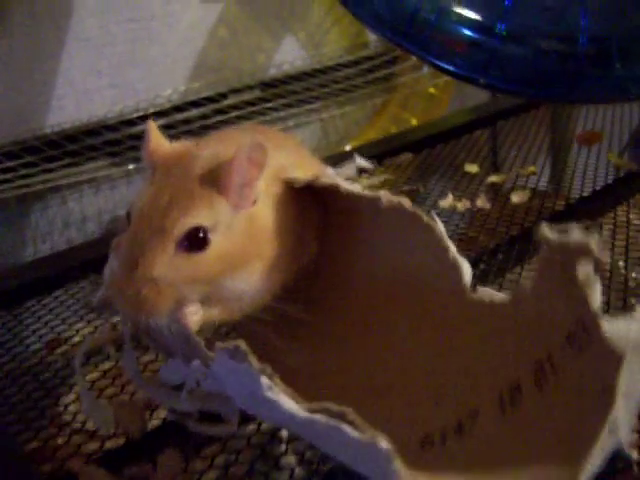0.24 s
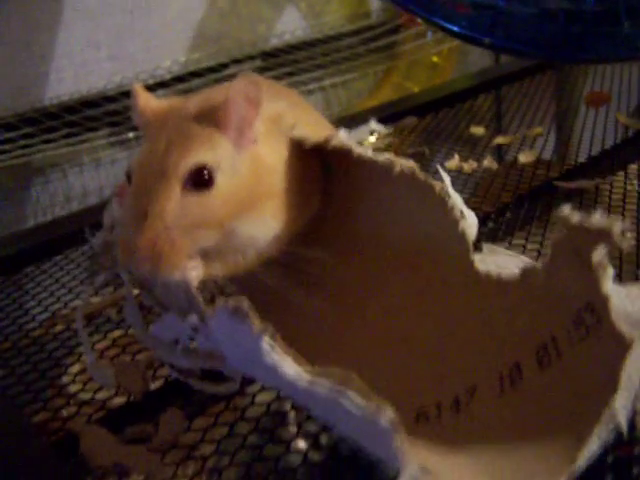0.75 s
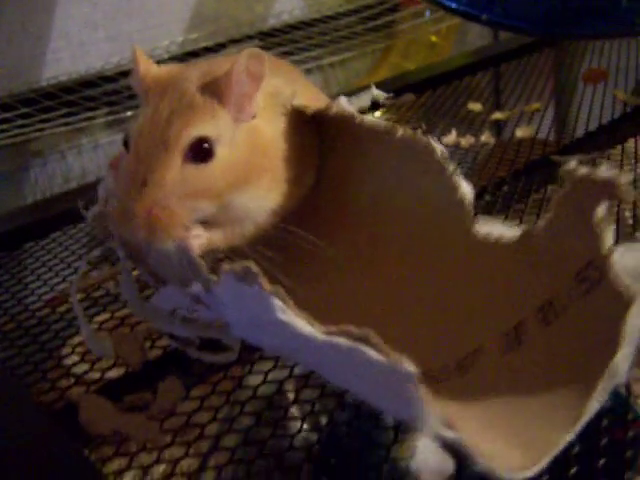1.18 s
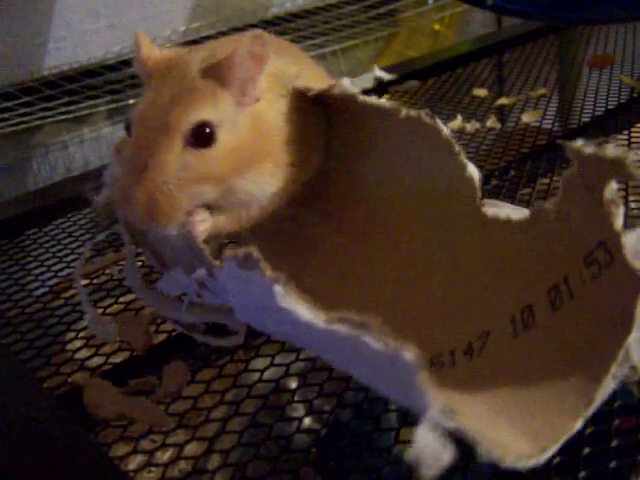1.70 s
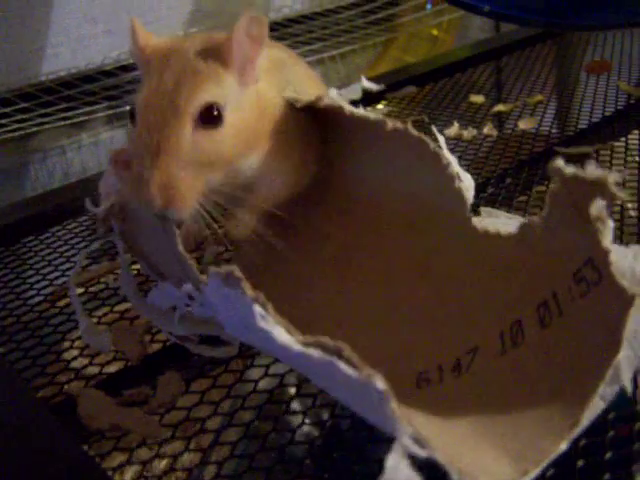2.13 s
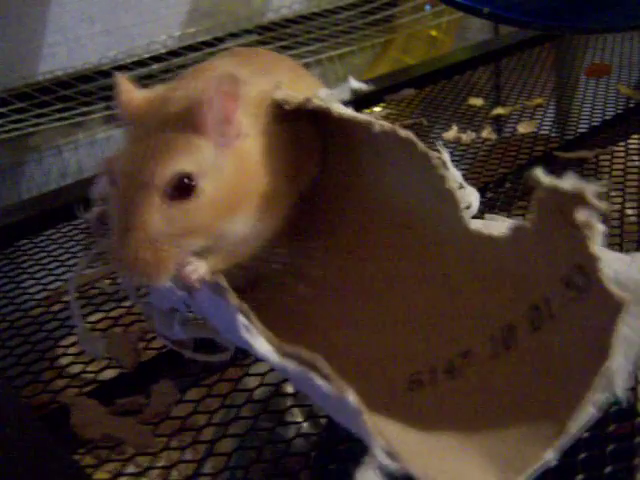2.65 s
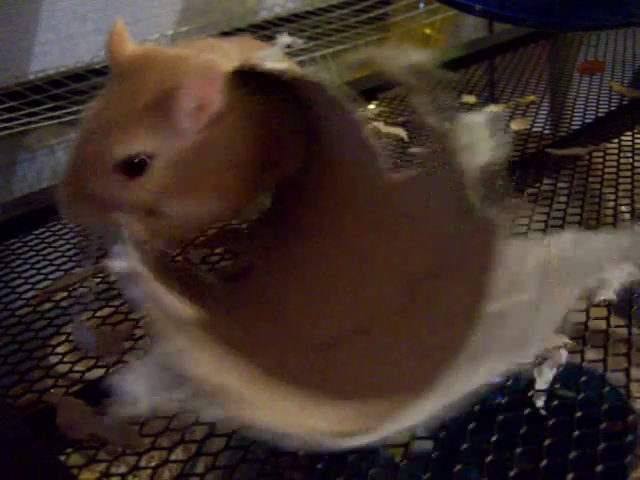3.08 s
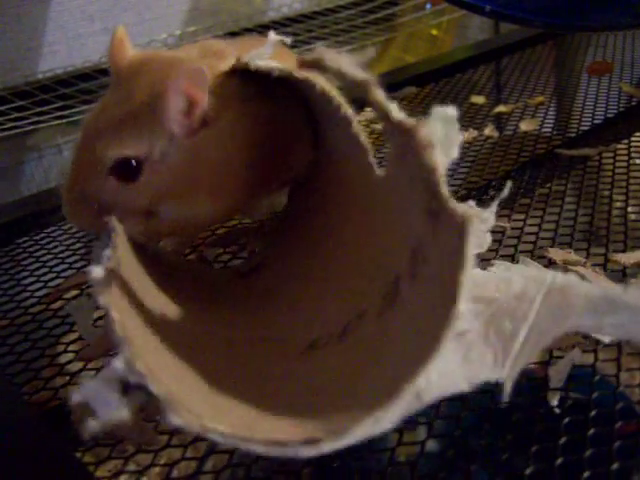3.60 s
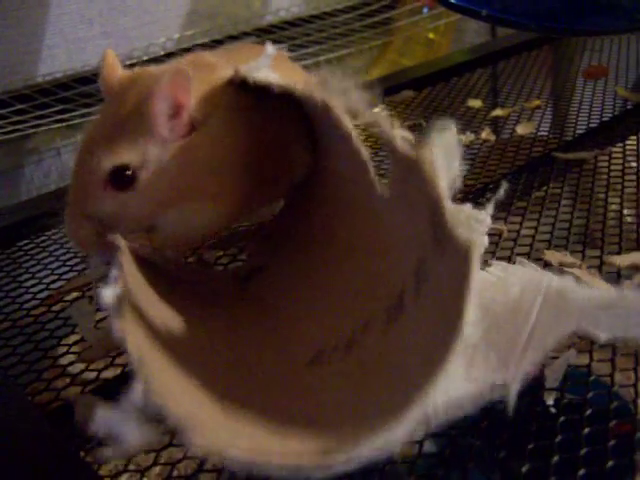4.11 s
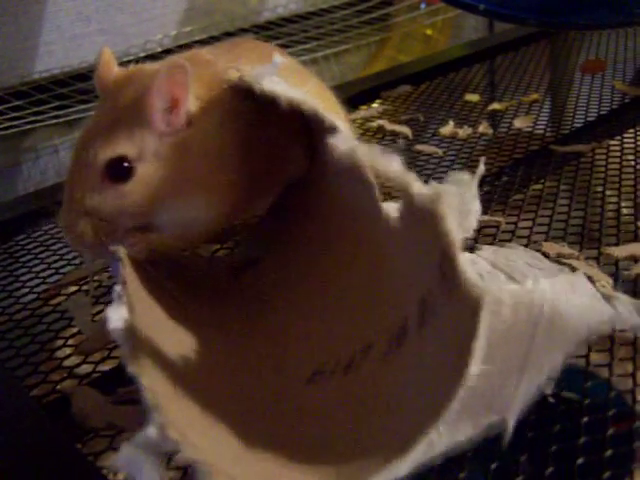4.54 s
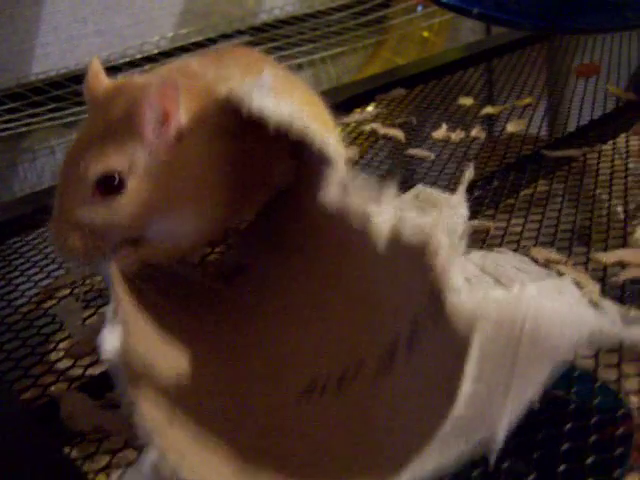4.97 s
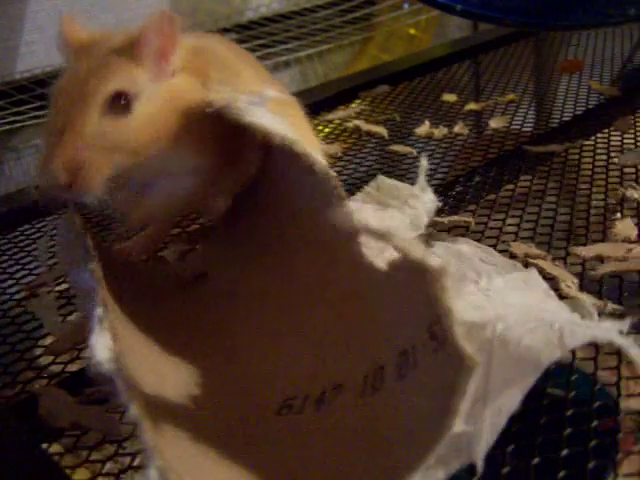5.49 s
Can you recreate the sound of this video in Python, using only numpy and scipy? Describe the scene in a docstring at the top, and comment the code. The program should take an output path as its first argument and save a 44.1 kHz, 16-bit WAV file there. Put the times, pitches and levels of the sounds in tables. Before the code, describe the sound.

Close mono pickup by a small camera in a cage: teeth nip and pull at stiff card. Clicky snaps cluster quickly through the first three seconds, the hardest near 0.8; longer crisp tearing pulls follow, more spaced, with another hard crack just after five seconds. Hollow papery ring, tiny scratches, muffled floor knocks around one and two seconds, faint hiss, and a low hum strongest at the start.

```python
"""In its cage, a gerbil gnaws a cardboard tube on the wire mesh floor, close to a small camera.
Each pull of the teeth is a crackle of random fibre breaks, each break a click coloured by card.
Whole plies give way in snaps and short rips that ring in the tube, made of sparse fading echoes.
Bumps are decaying sines and scuffs are shaped noise; a fading low hum and a faint hiss lie beneath."""
import sys
import numpy as np
from scipy import signal
from scipy.fft import rfft, irfft
from scipy.io import wavfile

SR = 44100
rng = np.random.default_rng(int(sys.argv[2]) if len(sys.argv) > 2 else 0)


def unload_wav(signal):
    """Save mono or channel-first audio to the path in sys.argv[1] as 16-bit WAV at rate SR, clipped to [-1, 1]."""
    wavfile.write(
        sys.argv[1],
        SR,
        np.round(np.clip(np.atleast_2d(signal).T, -1, 1) * 32767).astype(np.int16),
    )


N = 253134  # length in samples

# Plies that break. Each row: time in seconds, level in dB over 10 ms, pitch of the loose flap in Hz,
# time the crack runs in seconds, bass tilt in dB, treble tilt in dB.
PLY_SNAPS = [(0.0098, -32, 3027, 0.003161, 2.5, -3), (0.1442, -22, 1630, 0.00424, -6.5, -6.5),
             (0.2922, -17.5, 2809, 0.000407, -8.5, 1), (0.3381, -23.5, 1568, 0.003677, -5.5, -6.5),
             (0.376, -36, 2170, 0.001857, 4.5, -9.5), (0.4393, -42, 2264, 0.002509, 4.5, -17.5),
             (0.514, -37.5, 2515, 0.00113, 5.5, -16.5), (0.65, -31.5, 2913, 0.002073, -0.5, 5.5),
             (0.841, -14, 3043, 0.000437, -8, -3), (0.9321, -26, 1600, 0.00415, -16.5, -0.5),
             (1.0715, -23, 4274, 0.002762, -2.5, 0.5), (1.1019, -28, 2476, 0.003646, -2.5, 2),
             (1.2336, -32.5, 3129, 0.000722, -7, 0), (1.2874, -34.5, 2902, 0.0013, 2, -13),
             (1.3732, -34.5, 2230, 0.00039, -13.5, 1.5), (1.56, -22.5, 4371, 0.00053, -4.5, -4),
             (1.5625, -21, 3192, 0.000301, -15.5, -7), (1.661, -32.5, 1657, 0.00441, -2, -2),
             (1.7342, -32, 2757, 0.002698, -7, 1.5), (1.8271, -20, 1630, 0.005993, -8.5, -6),
             (1.901, -26.5, 3120, .002, -9.5, -2.5), (1.9106, -25.5, 3066, 0.004697, -6, -0.5),
             (1.9204, -22.5, 2864, 0.001303, 9.5, -3.5), (2.2125, -34.5, 2688, 0.002067, 1, -7.5),
             (2.3818, -26.5, 1540, 0.0076, -14.5, -5.5), (2.6209, -21.5, 2481, 0.003126, -3.5, 7),
             (2.651, -32.5, 3035, 0.002468, -3.5, -6), (2.7374, -25, 1806, 0.00355, -19, 4),
             (2.785, -24.5, 3013, 0.000778, 2, 0.5), (2.9113, -30, 2839, 0.003386, 6, 9),
             (3.1731, -33, 2764, 0.002265, -11, 2.5), (3.279, -26.5, 2430, 0.001881, -3.5, -0.5),
             (3.29, -30, 2420, 0.0012, -18, 0), (3.4203, -27.5, 2586, 0.000531, -1, 2.5),
             (3.461, -32, 4218, 0.00077, 1, 1), (3.6641, -32.5, 1556, 0.005072, -2.5, -1),
             (3.7577, -34, 1880, 0.00198, 3, 7.5), (3.9401, -22, 3827, 0.00561, 1.5, 1),
             (4.1123, -29.5, 3700, 0.007056, 8, 9), (4.3741, -27.5, 3043, 0.002444, -4, 8),
             (4.5828, -32, 2882, 0.0054, 7, -7.5), (4.5957, -33, 2716, 0.006133, -0.5, 6),
             (4.7065, -23, 2937, 0.007114, 5, 2.5), (4.8371, -31.5, 3436, 0.01014, 0.5, 1),
             (5.1324, -32, 2026, 0.00135, -8.5, 7.5), (5.1754, -15.5, 1766, 0.0007413, 2.5, -1.5),
             (5.5819, -28.5, 2133, 0.00403, -12, 3.5), (5.6923, -24, 4872, 0.0002018, -19.5, -11)]
# Longer pulls that tear fibres off the edge. Each row: start in seconds, length in seconds,
# level in dB and treble tilt in dB, both before the trims in pulls().
FIBRE_PULLS = [(0.229, 0.0399, -43, 0.5), (0.714, 0.03088, -43.5, 3), (0.812, 0.06194, -42, 2),
               (0.97, 0.02392, -39.5, -5), (1.054, 0.0908, -39.5, 1.5), (1.193, 0.04562, -42, -4),
               (1.527, 0.1255, -43.5, 0.5), (1.699, 0.0477, -38.5, 2.5), (2.409, 0.0332, -42, -0.5),
               (2.499, 0.06067, -36, 4), (2.601, 0.07734, -42.5, 0.5), (2.711, 0.0337, -33, 7.5),
               (2.848, 0.02504, -39.5, -4), (2.956, 0.09741, -40, 3.5), (3.157, 0.1247, -41.5, 1.5),
               (3.39, 0.08938, -42, 3.5), (3.667, 0.11365, -43, 5), (3.846, 0.0868, -41.5, 5.5),
               (4.29, 0.06844, -45.5, 8), (4.576, 0.07918, -40.5, 11), (4.682, 0.11402, -42.5, 1),
               (4.955, 0.05556, -36, 2.5), (5.228, 0.10743, -35, 3.5), (5.525, 0.01408, -46.5, 6.5)]
# Faint single ticks of the teeth. Each row: time in seconds, peak in dB, before the shift and trim in ticks().
TOOTH_TICKS = [(1.218, -21.5), (1.4504, -20.5), (2.0119, -22), (2.114, -26.5), (2.5472, -20),
               (2.867, -23.5), (3.02, -17.5), (4.1962, -20), (4.2945, -24), (4.42, -21.5), (4.465, -27),
               (4.78, -26), (5.0527, -20.5), (5.279, -20)]
# How busy jaws and paws are between pulls. Each row: time in seconds, level in dB before the trim in fidget().
FIDGET_LEVEL = [(0.0, -44.5), (0.65, -49.5), (1.01, -41), (1.39, -51.5), (1.79, -40.5), (2.0, -61),
                (2.25, -49), (2.61, -42.5), (3.74, -49), (3.88, -44), (4.49, -50), (5.15, -44),
                (5.37, -55.5), (5.74, -51)]
# The colour of breaking card. Each row: frequency in Hz, relative level in dB.
CARD_COLOUR = [(100, -21), (400, -17), (700, -11.5), (1000, -5), (1400, -2.5), (1800, 2), (2300, -0.5),
               (3000, 4.5), (4000, -0.5), (5000, -3.5), (6000, -7.5), (7300, -10), (8300, -26.5),
               (10000, -52.5)]
# Resonances of the tube. Each row: frequency in Hz, width in Hz, boost in dB.
TUBE_RESONANCES = [(1139.9, 100, 3), (1630, 190, 6), (1943.6, 160, 7.5), (2430, 90, 6.5), (3120, 160, 0),
                   (3488.7, 190, 1), (3726.1, 150, 11), (4370, 250, 1.5)]
# How long the tube and cage echo. Each row: frequency in Hz, time to fade by 60 dB in seconds.
TUBE_DECAY = [(300, 0.84), (2000, 0.2863), (3600, 0.23365), (5000, 0.27), (8000, 0.11)]
# The tube bumps the floor. Each row: time in seconds, level in dB, pitch in Hz, time to fade by 60 dB in seconds.
FLOOR_BUMPS = [(1.072, -34.5, 187, 0.1514), (1.605, -36, 212, 0.1517), (1.921, -28.5, 129, 0.2466),
               (2.041, -36.5, 105, 0.17), (2.689, -39.5, 135, 0.434)]
# The tube or a paw scuffs the floor. Each row: start in seconds, length in seconds, level in dB, centre in Hz.
FLOOR_SCUFFS = [(0.327, 0.2088, -49, 272), (1.039, 0.10784, -46, 644), (1.264, 0.09666, -46.5, 742),
                (1.913, 0.02426, -42.5, 485.5), (1.918, 0.0765, -48, 198.6), (2.68, 0.10853, -52, 227.7)]
# The colour of the hiss. Each row: frequency in Hz, relative level in dB per Hz.
HISS_COLOUR = [(25, -15), (55, -14.5), (100, 0), (170, -6), (220, -5.5), (450, -14), (680, -11),
               (850, -6.5), (1050, -5.5), (1350, -7.5), (2200, -16), (3300, -21.5), (3550, -14.5),
               (4300, -21.5), (5000, -20.5), (7400, -33.5), (8600, -52.5), (11000, -87)]

EDGE_HZ = 8900  # top of the band that is heard
TAPS = 2048  # length of a click in samples
HZ = np.fft.rfftfreq(TAPS, 1 / SR)
FLAP_DB = 12  # how strongly a loose flap rings in a snap
# a clean break hardly stirs the tube; a slow rip does, the more the larger and duller the flap
CLEAN_RING_DB, RIP_RING_DB, RING_DB_PER_OCTAVE, RING_PER_TREBLE_DB = -16, -6, -1.5, -0.6214
FLAP_HZ = 3000  # flap pitch the octaves are counted from
# the teeth tug at a ply just before it breaks and a little after; harder, brighter breaks tear more fibres
TUG_LEAD_S, TUG_S, TUG_DB = .009, .036, -35.5
TUG_PER_SNAP_DB, TUG_PER_TREBLE_DB, TUG_TREBLE_DB = 0.4316, 0.4595, 1
# the hum starts strong, soon settles, then fades slowly
HUM_HZ, HUM_DB, HUM_SWELL_DB, HUM_SETTLE_S, HUM_FADE_DB_PER_S = 71.645, -45, 11.5, 0.53, 1.9174
HISS_DB = -43


def amp(db):
    """Decibels to gain."""
    return 10 ** (np.asarray(db) / 20)


def unit(x):
    """Scales to an rms of one."""
    return x / np.sqrt(np.mean(x ** 2) + 1e-20)


def read(points, hz):
    """A spectrum joined by straight lines on a log-frequency axis."""
    f, value = np.transpose(points)
    return np.interp(np.log(hz + 1), np.log(f + 1), value)


def follow(rows):
    """The columns of a time curve, sample by sample."""
    s, *columns = np.transpose(rows)
    return [np.interp(np.arange(N) / SR, s, c) for c in columns]


def add(mix, s, sound):
    """Mixes a sound in at a time in seconds."""
    part = mix[max(round(s * SR), 0):][:len(sound)]
    part += sound[:len(part)]


def hump(hz, centre_hz, width_hz):
    """A resonance curve of height one."""
    return 1 / (1 + (2 * (hz - centre_hz) / width_hz) ** 2)


def causal(db):
    """The sharpest click that has this spectrum (minimum phase)."""
    log_gain = np.log(amp(np.r_[db, db[-2:0:-1]]))
    return np.fft.ifft(np.exp(np.conj(signal.hilbert(log_gain)))).real


def noise(gain):
    """Steady noise whose spectrum is gain(Hz), at an rms of one."""
    spectrum = rfft(rng.standard_normal(N))
    return unit(irfft(spectrum * gain(np.fft.rfftfreq(N, 1 / SR)), N))


def fibres(size, per_s, spread_db):
    """Fibres break at random moments, most of them weakly."""
    strength = amp(spread_db * np.minimum(rng.exponential(1, size), 4))
    return strength * rng.choice([-1, 1], size) * (rng.random(size) < per_s / SR)


def card(flap_hz, flap_db, bass_db, treble_db, width_hz=480, travel_s=0.001043):
    """The click of one break: the card's colour, tilted, with the ring of the flap that springs free."""
    bass = np.interp(HZ, [500, 1100, 1700, 2700], [0, 1, 1, 0])
    treble = np.interp(HZ, [3700, 5500], [0, 1])
    flap = flap_db * hump(HZ, flap_hz, width_hz)
    click = causal(read(CARD_COLOUR, HZ) + bass_db * bass + treble_db * treble + flap)
    # bending waves in card carry the treble faster than the bass
    lag_turns = travel_s * (2 * np.sqrt(HZ * EDGE_HZ) - HZ) * .5
    return irfft(rfft(click) * np.exp(-2j * np.pi * lag_turns))


def snaps(clean_s=0.0015334, echo_db=-9, echo_s=0.003669, strain_db=-13, strain_s=0.0041,
          colour_share=0.9):
    """Fibres creak under the strain, the ply breaks cleanly or in a dying run, and the tube rings."""
    out = np.zeros(N)
    lead = TAPS // 4  # room for the creak ahead of the break
    t = (np.arange(TAPS) - lead) / SR
    after = np.maximum(t, 0)
    for s, db, flap_hz, run_s, bass_db, treble_db in PLY_SNAPS:
        strain = unit(fibres(TAPS, 3700, 1.2) * np.exp(-abs(t) / strain_s) * (t < 0))
        run = unit(fibres(TAPS, 9000, 0.44) * np.exp(-after / max(run_s, 1e-4)) * (t > 0))
        # a quick crack is mostly one clean break of strained card; a slow one is mostly small breaks
        clean = np.exp(-abs(run_s) / clean_s)
        clean_break = amp(strain_db) * strain + unit(1. * (t == 0))
        breaks = np.sqrt(clean) * clean_break + np.sqrt(1 - clean) * run
        # the near walls of the tube scatter each snap within a few milliseconds
        swell = np.exp(-after / echo_s) - np.exp(-2 * after / echo_s)
        scatter = unit(rng.standard_normal(TAPS) * swell)
        colour = np.array([FLAP_DB, bass_db, treble_db])
        snap = signal.fftconvolve(breaks + amp(echo_db) * scatter, card(flap_hz, *colour))
        # the ring takes a milder colour, with less of the flap
        ring = tube(card(flap_hz, *(colour_share * colour * [.5, 1, 1])))
        octaves = np.log2(flap_hz / FLAP_HZ)
        rip_db = RIP_RING_DB + RING_DB_PER_OCTAVE * octaves + RING_PER_TREBLE_DB * treble_db
        ring_db = clean * CLEAN_RING_DB + (1 - clean) * rip_db
        size = amp(db) * np.sqrt(SR / 100)  # the energy of 10 ms at this level
        add(out, s - lead / SR, size * snap / np.linalg.norm(snap))
        add(out, s, size * amp(ring_db) * ring / np.linalg.norm(ring))
    return out


def tugs():
    """The short pull that goes with every snap, in rows like those of FIBRE_PULLS."""
    rows = []
    for s, snap_db, *_, treble_db in PLY_SNAPS:
        db = TUG_DB + TUG_PER_SNAP_DB * snap_db + TUG_PER_TREBLE_DB * treble_db
        rows.append((s - TUG_LEAD_S, TUG_S, db, TUG_TREBLE_DB + .5 * treble_db))
    return rows


def pulls(level_db=-1, per_s=150, spread_db=2.0, bass_db=-4, treble_lift_db=-1.5, flap_db=13,
          flap_width_hz=400, clump_db=4, jerk_db=3, grip_s=0.0023, release_s=0.0088, count=7):
    """Each pull grips, tears fibres off flaps of many sizes in small jerks, and lets go."""
    out = np.zeros(N)
    for s, length, db, treble_db in FIBRE_PULLS + tugs():
        t = np.arange(round((length + .05) * SR)) / SR
        knots = np.arange(0, length + .06, .008)  # the force wanders every 8 ms
        grip = (1 - np.exp(-t / grip_s)) / (1 + np.exp((t - length) / release_s))
        jerks = grip * amp(jerk_db * np.interp(t, knots, rng.standard_normal(len(knots))))
        tear = 0
        for hz in np.geomspace(1000, 6500, num=count) * rng.uniform(0.80955, 1.2015, size=count):
            # each flap gives way in its own clumps; small flaps ring higher and shorter
            clumps = amp(clump_db * np.interp(t, knots, rng.standard_normal(len(knots))))
            width_hz = flap_width_hz * np.sqrt(hz / 3000)
            flap = card(hz, flap_db, bass_db, treble_db + treble_lift_db, width_hz)
            breaks = fibres(len(t), per_s, spread_db) * clumps * jerks
            tear = tear + signal.fftconvolve(breaks, flap)
        level = amp(db + level_db) * np.sqrt(len(t))
        add(out, s, tear * level / (np.linalg.norm(tear) + 1e-9))
    return out


def ticks(level_db=-4, slip_db=-6, slip_s=0.0026):
    """The teeth nip a few fibres at a time: one break and a short dying run of others."""
    out, t = np.zeros(N), np.arange(TAPS) / SR
    for s, db in TOOTH_TICKS:
        slip = unit(fibres(TAPS, 6900, 2) * np.exp(-t / slip_s))
        breaks = unit(1. * (t == 0)) + amp(slip_db) * slip
        nip = signal.fftconvolve(breaks, card(2400, 8.7, -16.0, -1))
        add(out, s + .002, amp(db + level_db) * nip / abs(nip).max())
    return out


def fidget(level_db=-3):
    """Faint random ticks of teeth and claws on the card go on throughout, now busier, now calmer."""
    touches = fibres(N, per_s=700, spread_db=3.5)
    scratch = signal.fftconvolve(touches, card(2838, 5, -5.0, -1.5))[:N]
    return unit(scratch) * amp(follow(FIDGET_LEVEL)[0] + level_db)


def tube(x, rise_s=0.00061, echoes_per_s=1300):
    """Sparse echoes in the tube and the cage ring on after a break, each band fading at its own pace."""
    echoes = fibres(SR // 4, echoes_per_s, 2)
    hz, t, bands = signal.stft(echoes, SR, nperseg=256)
    fade = np.exp(-np.log(1000) * t / read(TUBE_DECAY, hz)[:, None])
    tail = signal.istft(bands * fade, SR)[1]
    tail *= 1 - np.exp(-np.arange(len(tail)) / SR / rise_s)
    resonances = sum(db * hump(HZ, f, width) for f, width, db in TUBE_RESONANCES)
    colour = causal(resonances - 8.5)
    return signal.fftconvolve(x, signal.fftconvolve(tail / np.linalg.norm(tail), colour))


def handling(scuff_width=0.785, overtone=1.2, overtone_db=-5):
    """Dull bumps (two fading sines) and scuffs (band noise) on the springy mesh floor."""
    out, t = np.zeros(N), np.arange(SR // 2) / SR
    for s, db, hz, t60 in FLOOR_BUMPS:
        turn, fade = 2 * np.pi * hz * t, np.exp(-np.log(1000) * t / t60)
        # the overtone dies twice as fast
        thump = np.sin(turn) + amp(overtone_db) * fade * np.sin(overtone * turn)
        add(out, s, amp(db) * fade * thump)
    for s, length, db, hz in FLOOR_SCUFFS:
        size = round(length * SR)
        rub = noise(lambda f: hump(f, hz, scuff_width * hz))[:size]
        add(out, s, amp(db) * unit(rub * np.hanning(size)))
    return out


def hum(rumble_db=-54.5):
    """A low, slightly unsteady tone dies down into a steady narrow band of rumble."""
    t = np.arange(N) / SR
    db = HUM_DB + HUM_SWELL_DB * np.exp(-t / HUM_SETTLE_S) - HUM_FADE_DB_PER_S * t
    sway = 1 + .27 * noise(lambda f: hump(f, 0, 14))
    tone = np.sqrt(2) * amp(db) * sway * np.sin(2 * np.pi * HUM_HZ * t)
    return tone + amp(rumble_db) * noise(lambda f: hump(f, 72.8, 49))


def hiss():
    """A faint, steady bed of coloured noise."""
    return amp(HISS_DB) * noise(lambda f: amp(read(HISS_COLOUR, f)))


def scene():
    """Snaps and crackle, their ring in the tube, handling, hum and hiss, in one channel."""
    crackle = pulls() + fidget() + ticks()
    bed = hiss()
    crackle_ring = amp(-9.5) * tube(crackle)[:N]
    return (snaps() + crackle + crackle_ring + handling() + hum() + bed)[None]


def record(dry, ceiling=1.0):
    """The camera rounds off the hardest snaps and cuts the treble above its band."""
    rounded = dry / (1 + (dry / ceiling) ** 4) ** .25
    low_pass = signal.firwin(255, EDGE_HZ, window=("kaiser", 8), fs=SR)
    return signal.oaconvolve(rounded, low_pass[None], "same", axes=1)


dry = scene()
out = record(dry)
unload_wav(out)
```